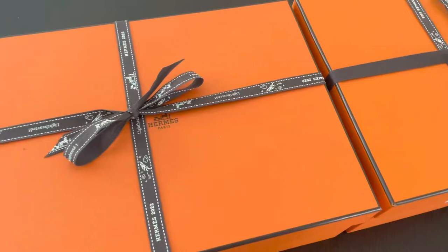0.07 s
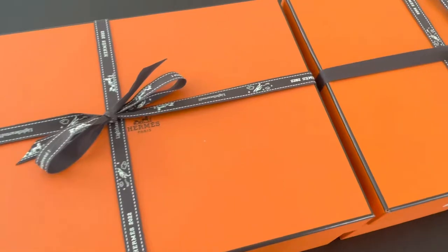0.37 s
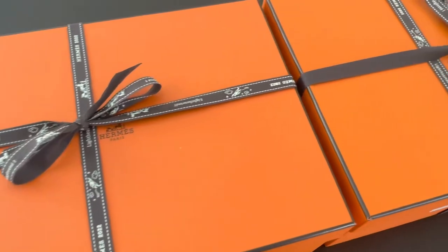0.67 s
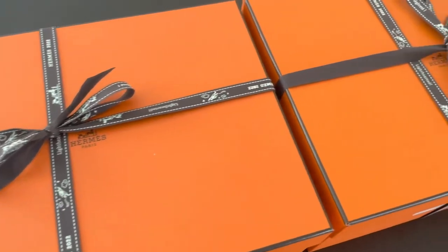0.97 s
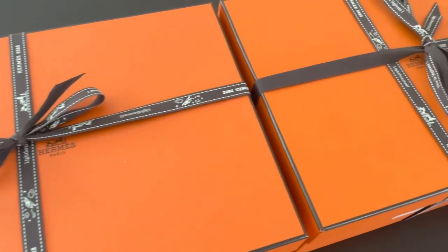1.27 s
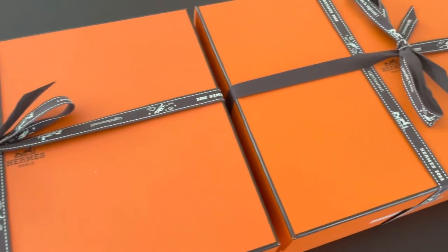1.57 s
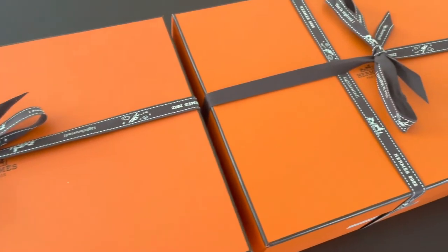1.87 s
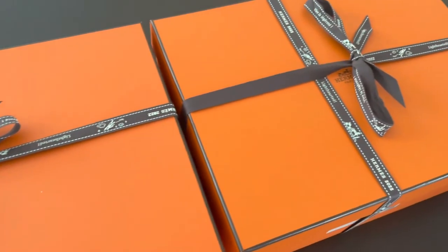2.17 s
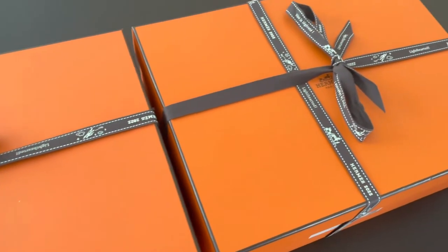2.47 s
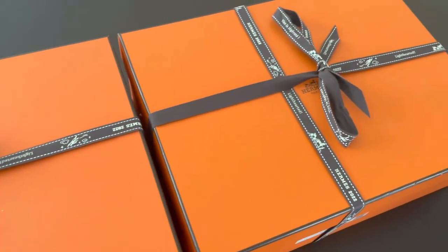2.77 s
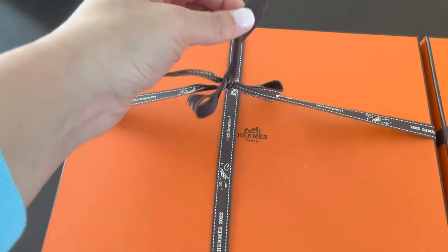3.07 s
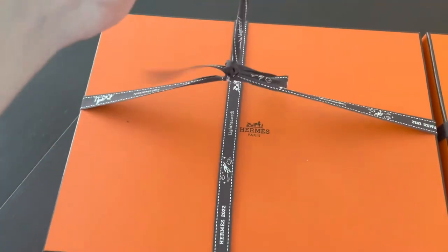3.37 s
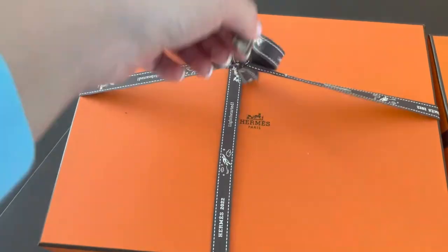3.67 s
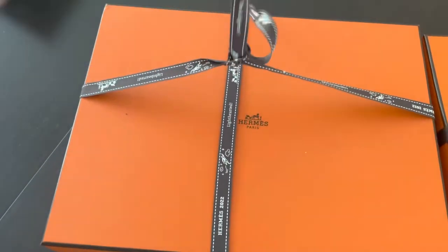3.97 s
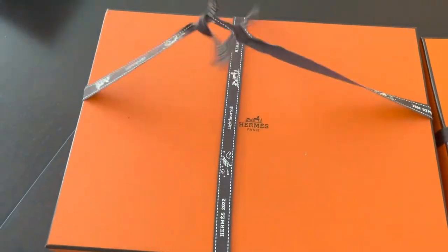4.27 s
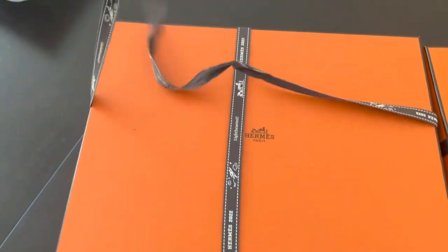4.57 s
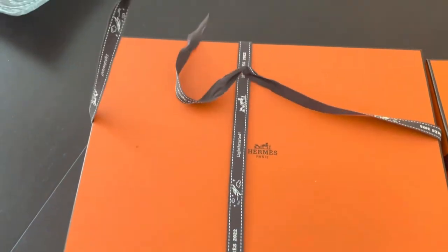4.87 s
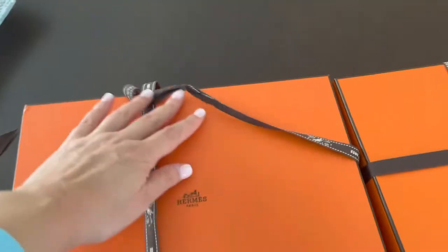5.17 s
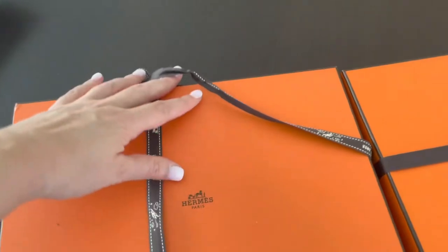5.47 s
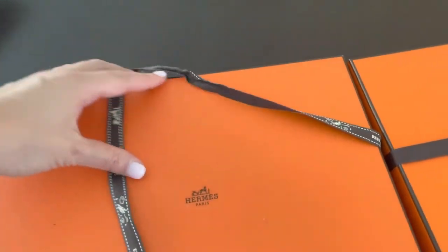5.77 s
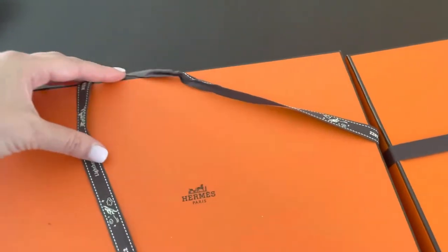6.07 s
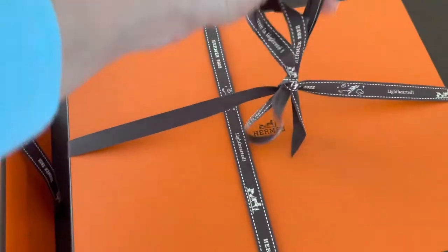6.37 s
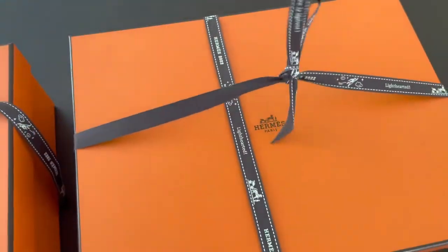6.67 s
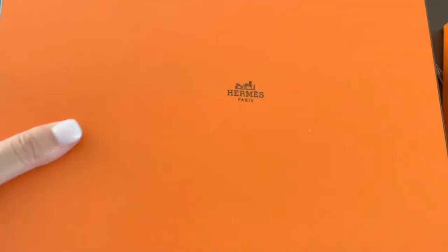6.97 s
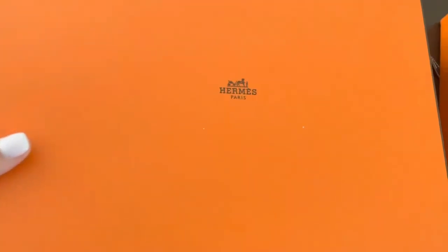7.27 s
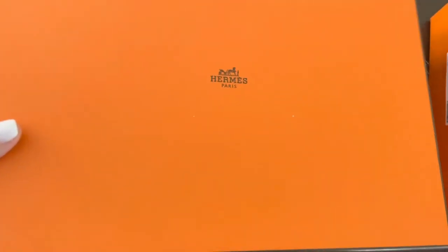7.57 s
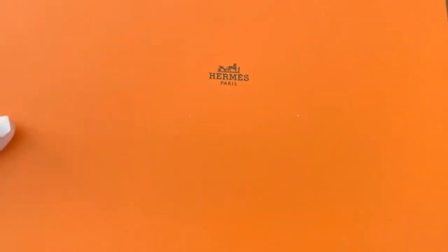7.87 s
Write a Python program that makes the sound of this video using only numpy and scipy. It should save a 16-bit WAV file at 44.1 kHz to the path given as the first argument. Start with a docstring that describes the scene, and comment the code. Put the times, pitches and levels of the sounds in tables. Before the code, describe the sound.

In a softly humming room, two ribbon bows are pulled loose in quick, hissing tugs, and a hand brushes over hollow cardboard boxes.

```python
"""A quiet room fades in, humming. Near 3 s a woven ribbon rasps through its knot on a cardboard gift
box in quick pulls, snaps free and slides off, while small taps rattle on the lid. From 5 s a hand
brushes the hollow box. Just after 6 s a second bow is untied on another box; then fingers and a palm
rub that box, which rumbles as it shifts. Every stroke speeds up, holds and dies away, its hiss, card
scrape and lid drone sharing that envelope. Along the way the level dips briefly five times."""
import sys
import numpy as np
from scipy import signal
from scipy.fft import rfft, irfft, next_fast_len
from scipy.io import wavfile
from scipy.ndimage import uniform_filter1d, map_coordinates

SR = 44100
rng = np.random.default_rng(int(sys.argv[2]) if len(sys.argv) > 2 else 0)


def generate_wav(sig):
    """Save sig (samples, or channels by samples) to the path in sys.argv[1] as 16-bit PCM at SR."""
    pcm = np.round(np.clip(np.atleast_2d(sig).T, -1, 1) * 32767).astype(np.int16)
    wavfile.write(sys.argv[1], SR, pcm)


N = 349713
TIME = np.arange(N) / SR
SECOND_BOX_S = 6.1  # strokes from here on are on the neighbouring box


# Ribbon strokes through a knot. Each row: moment of full speed in seconds, hold in seconds, rise and
# fall in seconds per 20 dB, hiss level in dB, scrape and drone in dB over the hiss, lid pitch in Hz.
PULLS = [(3.08, .0169, .0088, .0464, -43.5, -9.5, -3.5, 310),
         (3.115, .059, .0192, .0611, -49, -7.5, 3, 390), (3.18, .0227, .0529, .0676, -44, -10.5, -3, 360),
         (3.223, .024, .0121, .06, -53, -5, 5, 250), (3.743, .0548, .0409, .0327, -48, -15, -5.5, 210),
         (3.834, .0433, .0341, .139, -51, -11, 0, 210), (3.911, .094, .1, .0342, -53.5, -9, -3, 330),
         (6.172, .038, .0244, .0194, -59.5, -13, -9, 220), (6.216, .043, .01, .0118, -45, -12, -4, 270),
         (6.285, .11, .0421, .08, -44.5, -9, -2.5, 250), (6.43, .045, .0632, .035, -58, -13, 6, 150),
         (6.502, .065, .003, .0618, -44, -8, -4, 240), (6.6, .0199, .0678, .0949, -49.5, -14, 2, 220),
         (6.65, .0237, .0215, .12, -52, -6, 1, 180), (6.755, .02, .07, .018, -46.5, -.5, 4.5, 350),
         (6.794, .016, .06, .0228, -53, -8, -8, 330), (6.821, .036, .016, .045, -41.5, -5, -9, 400)]
KNOT_CREEP = [(3.415, .024, .024, .111, -73.5, -19.5, 7, 270), (3.59, .1074, .125, .027, -67, 5, 2.24, 280)]  # the knot creeping under tension, rows as in PULLS
SLACK_SLIDES = [(4.14, .0408, .11, .062, -60.5, -12.5, 3.5, 260),
                (4.226, .127, .006, .096, -61, -12, -1.5, 260), (4.425, .1812, .072, .112, -69, -8, 6, 280),
                (4.68, .121, .059, .088, -79, -21, 3, 260)]  # the loosened band sliding off, rows as in PULLS
# Tone of the weave's hiss and of two scrapes. Each row: frequency in Hz, level in dB.
WEAVE_HISS = [(1200, -35.5), (2800, -18), (3800, -10.5), (4700, -5), (5500, -7.5), (6600, -1.5), (7700, 0),
              (8900, 1.5), (10800, 0), (13000, .5), (14500, -7), (16000, -18)]
SATIN_SCRAPE = [(350, -16), (650, -1), (900, -1), (1200, 2.5), (1650, -2.5), (1950, -4.5), (2400, -5),
                (3100, -7), (3800, -7.5), (5000, -11.5), (9000, -39.5)]
KNOT_SCRAPE = [(400, 8), (800, 1), (1300, 3), (2100, 7.5), (2700, 2), (3800, -6.5), (8000, -37.5)]
# The first box's card bending and lid resonances. Each row: frequency in Hz, width in Hz, level in dB.
FIRST_CARD = [(827.3, 33, 2), (1050.4, 70, -3), (1170, 91, -0.5), (1264, 48, -3), (1363.6, 35, 0.5),
              (1564, 87, -6), (1850, 110, -3), (2400, 150, 1)]
FIRST_LID = [(100, 60, 0), (166.5, 53, -4), (229.5, 26, 4), (263.5, 30, -2), (312.2, 28, 2), (387, 26, 7),
             (427, 24, -8)]

def first_bow():
    """Ribbon rasps through the knot, creeps under tension and slides off, setting the lid droning."""
    pulls, _ = by_box(PULLS)
    rasp = rubbing(pulls, WEAVE_HISS, SATIN_SCRAPE, FIRST_CARD, slips_per_s=3700, grit_per_s=350,
                   scatter_db=2, judder_db=1.45, grit_db=1, patchy_db=3.2, ring_db=-2,
                   hiss_db=-.69, scrape_db=-1.5)
    creep = rubbing(KNOT_CREEP, WEAVE_HISS, KNOT_SCRAPE, FIRST_CARD, slips_per_s=3000, grit_per_s=400,
                    scatter_db=3, judder_db=1.5, grit_db=-7, patchy_db=3, ring_db=-18.5, hiss_db=1)
    slide = rubbing(SLACK_SLIDES, WEAVE_HISS, SATIN_SCRAPE, FIRST_CARD, slips_per_s=2200, grit_per_s=280,
                    scatter_db=1, judder_db=2.6, grit_db=-6, patchy_db=3, ring_db=-6.5, scrape_db=-2)
    drone = lid_drone(pulls + KNOT_CREEP + SLACK_SLIDES, FIRST_LID, trim_db=-2)
    return rasp + creep + slide + drone + snags(pulls)


# Tone of the second ribbon's scrape. Each row: frequency in Hz, level in dB.
SECOND_SCRAPE = [(350, -14), (650, 0), (900, 1), (1200, 0), (1650, -2.5), (2000, -4), (2400, -5.5),
                 (3000, -6.5), (3900, -8.5), (5000, -8.5), (9000, -39.5)]
# The second box's card bending and lid resonances. Each row: frequency in Hz, width in Hz, level in dB.
SECOND_CARD = [(693.7, 41, -0.5), (836, 28, 0), (933, 28, 2), (1030.6, 30, 2.5), (1163.6, 50, 3.5),
               (1421, 54.9, -2), (1596.6, 39, 6), (1958, 94, -3), (2380, 120, -5)]
SECOND_LID = [(165.5, 28, 2), (240, 36, 4), (292, 30, 2), (342, 36, 1.5), (408.8, 50, -3), (499, 50, 2),
              (620, 90, 0)]

def second_bow():
    """Ribbon rasps through the knot on the neighbouring box, which has resonances of its own."""
    _, pulls = by_box(PULLS)
    rasp = rubbing(pulls, WEAVE_HISS, SECOND_SCRAPE, SECOND_CARD, slips_per_s=4500, grit_per_s=380,
                   scatter_db=2.5, judder_db=1.1, grit_db=1, patchy_db=3.6, ring_db=-1, scrape_db=-.73)
    return rasp + lid_drone(pulls, SECOND_LID, trim_db=-1) + snags(pulls)


def snags(pulls):
    """Single threads snag at random: sparse ticks, as strong as the pull that makes them."""
    hiss_gain, scrape_gain = stroke_gains(pulls)
    ticks = catches(per_s=34, scatter_db=3.5)
    bright = amp(-19) * hiss_gain * coloured(ticks, WEAVE_HISS)
    return bright + amp(-11) * scrape_gain * coloured(ticks, SATIN_SCRAPE)


# The ribbon snaps taut or flicks free. Each row: start in seconds, level in dB, 60 dB decay in seconds,
# flap in dB over the hiss, flap pitch in Hz.
SNAPS = [(3.034, -53, .0186, -24, 1500), (3.078, -30, .04, -16, 1300), (3.220, -35.5, .02, -4, 2400),
         (3.241, -44.5, .035, 5, 1170), (3.3885, -48, .0211, -2.5, 1500), (3.7207, -38, .025, -15, 1500),
         (3.738, -32, .0173, -13.5, 1300), (3.8179, -26, .0158, -9, 1700), (3.889, -45, .0215, 5, 1250),
         (3.980, -37, .024, -2, 1900), (4.1542, -48, .02, -9, 1300), (4.292, -34, .0243, -16, 1500),
         (4.3173, -27, .017, -17, 1500), (4.332, -28.5, .036, -18, 1200), (4.4465, -48, .0317, -1, 2000),
         (4.482, -60, .039, 4, 1800), (4.517, -53.5, .0215, -4, 1600), (4.556, -43, .026, -5, 1500),
         (6.509, -42, .02, 7, 1150), (6.527, -30, .025, -6, 2300), (6.6015, -28.5, .035, -11, 1500),
         (6.645, -34, .012, -20, 1500), (6.655, -20.5, .026, -9, 1600), (6.677, -32, .02, 2, 1700),
         (6.755, -39, .02, 5, 1600), (6.766, -37, .025, 5, 1100), (6.777, -38, .012, -3, 900),
         (6.826, -35, .03, 0, 1000), (6.835, -31, .014, -2, 1900), (6.851, -19.5, .0125, -11, 1200),
         (6.8605, -26, .016, -3, 1300), (6.883, -36, .012, -2, 1300), (6.899, -46, .0134, -6, 1300)]
# Tone of a taut fold letting go. Each row: frequency in Hz, level in dB.
CREASE_HISS = [(1200, -30), (2800, -18), (3800, -11), (4800, 1), (5600, -4), (6700, 3), (7700, 0),
               (8800, 3), (10800, -2), (12700, -1), (14500, -9), (16000, -22)]

def snaps(trim_db=-6.5, rise_s=.00025):
    """Each snap is a burst of fibre slips at a fold, with the soft flap of the freed ribbon."""
    out, t = np.zeros((2, N)), np.arange(SR // 10) / SR
    for start, db, t60, flap_db, flap_hz in SNAPS:
        hiss, flap = rng.standard_normal((2, 2, len(t)))
        flap = unit(filtered(flap, lambda hz: near(hz, flap_hz, octaves=.5)))
        envelope = amp(db + trim_db - 60 * t / t60) * (1 - np.exp(-t / rise_s))
        add(out, start, envelope * (coloured(hiss, CREASE_HISS) + amp(flap_db) * flap))
    return out


BRUSHES = [(2.868, .0102, .0355, .11, -67, -20.5, -3, 280),
           (3.05, .0132, .0267, .0165, -62.5, -16, -5, 280), (5.152, .0378, .029, .107, -64, -11.5, 6, 300),
           (5.3, .167, .102, .106, -83.5, -1.5, 9.5, 250), (5.57, .2644, .1644, .2204, -61, -4, 1.5, 310),
           (5.93, .0526, .093, .061, -68.5, 0, 14.5, 310), (6.92, .0412, .048, .056, -72, -5.5, -1.5, 250),
           (7.014, .055, .0366, .106, -62, 4, 10, 300), (7.193, .0359, .169, .0556, -58.5, 3, 5.5, 360)]  # fingers and loose ends brushing a lid, rows as in PULLS
PALM_PUSHES = [(7.338, .0156, .014, .03, -76, 13, 21, 250), (7.375, .04, .0403, .044, -68, 12.5, 20.5, 380),
               (7.445, .055, .044, .04, -87, 23.7, 34.5, 260),
               (7.507, .016, .012, .046, -58, 12.5, 10, 330),
               (7.545, .026, .042, .045, -61, 8.5, 17.5, 370), (7.59, .02, .02, .02, -76, 16, 28, 420)]  # the palm pushing over cardboard, rows as in PULLS
# Tone of skin on card: its hiss and three scrapes. Each row: frequency in Hz, level in dB.
SKIN_HISS = [(1200, -30), (2800, -12), (3800, -6), (4700, -2), (5500, -4.5), (6600, 0), (8700, 1.5),
             (10800, -.5), (13000, -.5), (14200, -8), (16000, -30)]
HAND_SCRAPE = [(350, -6), (550, 2), (800, 1.5), (1300, 0), (1900, -5), (3100, -6), (4500, -8), (9000, -35)]
FINGER_SCRAPE = [(350, -12), (600, -2), (950, -2), (1230, 5), (1560, 1), (1800, -6), (2800, -6), (4900, -9),
                 (9000, -35)]
PALM_SCRAPE = [(350, -12), (600, 2), (850, 2), (1250, -1.5), (1700, 1), (2000, -4), (2350, -1.5),
               (2800, -3.5), (3050, -8.5), (3500, -8), (4100, -15.5), (4700, -14), (6000, -25),
               (10000, -50)]
# Lid resonances under the flat hand and the palm. Each row: frequency in Hz, width in Hz, level in dB.
HAND_LID = [(170, 70, -1), (280, 70, 2), (355, 45, 2), (540, 120, -6)]
PALM_LID = [(202.8, 69, 6), (339.2, 44.4, 6), (400, 31.6, 0.5), (476, 83, 4), (624, 220, 0)]

def hand():
    """Skin brushes each lid, then the palm pushes over the second; the hollow boxes drone underneath."""
    first, second = by_box(BRUSHES)
    light_touch = dict(slips_per_s=9000, grit_per_s=990, scatter_db=1, judder_db=.89, grit_db=-6,
                       hiss_db=-1.5, scrape_db=-1)
    flat_hand = rubbing(first, SKIN_HISS, HAND_SCRAPE, FIRST_CARD,
                        patchy_db=2.5, ring_db=-9, **light_touch)
    fingers = rubbing(second, SKIN_HISS, FINGER_SCRAPE, SECOND_CARD,
                      patchy_db=2.2, ring_db=-7, **light_touch)
    palm = rubbing(PALM_PUSHES, SKIN_HISS, PALM_SCRAPE, SECOND_CARD, slips_per_s=3000, grit_per_s=600,
                   scatter_db=2, judder_db=1.2, grit_db=-6, patchy_db=3.4, ring_db=-15, hiss_db=-3.5)
    drone = lid_drone(first, HAND_LID) + lid_drone(second + PALM_PUSHES, PALM_LID)
    return flat_hand + fingers + palm + drone


def rubbing(strokes, hiss_tone, scrape_tone, card_modes, slips_per_s, grit_per_s,
            scatter_db, judder_db, grit_db, patchy_db, ring_db, hiss_db=0, scrape_db=0):
    """Sliding contact: fine slips hiss; coarser catches add grit to the card scrape."""
    hiss_gain, scrape_gain = stroke_gains(strokes)
    grip = amp(judder_db * (wobble(380) + .27 * wobble(90)))
    slips = shifting_contact(grip * catches(slips_per_s, scatter_db), patchy_db)
    grit = amp(grit_db) * unit(grip * catches(grit_per_s, scatter_db=2))
    hiss = hiss_gain * coloured(slips, hiss_tone)
    scrape = scrape_gain * card_scrape(slips + grit, scrape_tone, card_modes, ring_db)
    return amp(hiss_db) * hiss + amp(scrape_db) * scrape


def catches(per_s, scatter_db):
    """Fibres catch and let go: two streams of tiny impulses at random moments, of scattered size."""
    size = amp(scatter_db * np.clip(rng.standard_normal((2, N)), -2, 1))
    caught = rng.random((2, N)) < per_s / SR
    return unit(caught * rng.choice([-1, 1], (2, N)) * size)


def shifting_contact(x, patchy_db):
    """The touching spot wanders over folds and card, so the colour changes in small irregular patches."""
    spectra = signal.stft(x, nperseg=512)[2]
    patches = uniform_filter1d(rng.standard_normal(spectra.shape[1:]), size=3, axis=0)
    patches = unit(uniform_filter1d(patches, size=8, axis=1))
    return unit(signal.istft(spectra * amp(patchy_db * patches), nperseg=512)[1][:, :N])


def card_scrape(contact, tone, modes, ring_db):
    """Stiff card answers a contact with a broad scrape plus its bending resonances, at rms 1."""
    def bending(f):
        return sum(amp(db) * 1j * f * width / (hz ** 2 - f ** 2 + 1j * f * width)
                   for hz, width, db in modes)
    return unit(coloured(contact, tone) + amp(ring_db) * unit(filtered(contact, bending)))


def lid_drone(strokes, modes, trim_db=0):
    """The lid drones under each stroke; the spot that is rubbed decides which resonances lead."""
    out, t = np.zeros((2, N)), np.arange(-SR // 4, SR * 2 // 3) / SR
    for at, hold, rise, fall, db, _, drone_db, pitch in strokes:
        def lid(f):
            return sum(amp(mode_db) * near(hz, pitch, octaves=.9) * steep_peak(f, hz, 1.5 * width)
                       for hz, width, mode_db in modes)
        ring = unit(filtered(rng.standard_normal((2, len(t))), lid))
        add(out, at + t[0], amp(db + drone_db + trim_db) * swell(t, hold, rise, fall) * ring)
    return out


# Taps and rattles on the lid. Each row: start in seconds, level in dB, favoured pitch in Hz,
# clack in dB relative to the knock.
KNOCKS = [(3.083, -45, 269.6, -26), (3.428, -53.5, 286, -21), (3.585, -42, 321, -9.5),
          (3.617, -49, 300, -11), (3.819, -48, 240, -7), (4.049, -34, 335, -19), (4.448, -38.5, 360, -15),
          (4.484, -52, 400, -14.5), (4.516, -49.5, 380, -21), (4.557, -37.5, 420, -5),
          (4.566, -44, 370, -16), (4.579, -49, 480, -10), (4.602, -56, 560, -8), (4.990, -60, 400, 7),
          (5.092, -63, 405, -2), (5.146, -45, 340, -12.5), (5.168, -46, 280, -21.5),
          (5.182, -47.5, 259, -16.5), (5.953, -46, 322, -34.5), (6.506, -43, 260, -11),
          (6.654, -31, 300, -7), (6.667, -33, 150, -27), (6.898, -52.5, 300, 1), (7.057, -37, 290, -8),
          (7.507, -43.5, 360, -6), (7.565, -39, 350, -19.5), (7.604, -42, 350, -15)]
# Modes of the hollow box. Each row: frequency in Hz, level in dB, 60 dB decay in seconds.
BOX_MODES = [(133.6, 8.5, 0.069), (181.4, -8, 0.17), (239.8, -3, 0.088), (312.5, 2.5, 0.0766),
             (368.4, -1.5, 0.0886), (457, 1.5, 0.0625), (558.8, -0.5, 0.0827), (708, -10, .06)]

def knocks(trim_db=.5, attack_s=.0033, scatter_cycles=.0874):
    """A knock rings the box modes near a pitch set by where it lands; a hard contact adds a clack."""
    out, t = np.zeros((2, N)), np.arange(SR // 4) / SR
    hz, mode_db, t60 = np.transpose(BOX_MODES)[:, :, None]
    bend_lag = 2.3 * np.log(hz)  # in cycles: low bending waves trail the high ones
    for start, db, pitch, clack_db in KNOCKS:
        strength = amp(mode_db + rng.normal(0, 1, hz.shape)) * near(hz, pitch, octaves=.415)
        phase = rng.random((2, 1, 1)) + rng.normal(0, scatter_cycles, (2, len(hz), 1))
        modes = strength * amp(-60 * t / t60) * np.sin(2 * np.pi * (hz * t - bend_lag + phase))
        ring = modes.sum(axis=1) * (1 - np.exp(-(t / attack_s) ** 2))
        ring /= np.abs(ring).max(axis=1, keepdims=True)
        add(out, start, amp(db + trim_db) * (ring + amp(clack_db) * clack(t)))
    return out


# Tone of a hard contact on card. Each row: frequency in Hz, level in dB.
CLACK_TONE = [(400, -9.5), (750, -1), (1020, 3), (1220, -3), (1450, -10.5), (1900, -8.5), (2400, -17.5),
              (3000, -32.5), (5000, -32), (12000, -45)]

def clack(t, noise_db=-5.5, noise_t60=.035, ring_db=-12, rise_s=.000499):
    """A hard contact gives a burst of noise and briefly rings the card's bending resonances."""
    hz, width, db = np.transpose(FIRST_CARD)[:, :, None]
    burst = coloured(rng.standard_normal((2, len(t))), CLACK_TONE) * amp(noise_db - 60 * t / noise_t60)
    decay = amp(db + along(CLACK_TONE, hz)) * np.exp(-np.pi * width * t)
    bending = decay * np.sin(2 * np.pi * (hz * t + rng.random((2, len(hz), 1))))
    return (1 - np.exp(-t / rise_s)) * (burst + amp(ring_db) * bending.sum(axis=1))


# The box shifts under the hand. Each row: moment of full speed in seconds, hold in seconds, level in dB.
NUDGES = [(6.421, 0.505, -54.5), (6.669, 0.0525, -46.5), (7.078, 0.1675, -52), (7.51, 0.044, -46)]

def nudges():
    """The whole box rumbles as it is nudged over the table."""
    power = sum((amp(db) * swell(TIME - at, hold, rise=.13, fall=.125)) ** 2 for at, hold, db in NUDGES)
    rumble_tone = [(20, -29.5), (40, -1.5), (68, 8.5), (100, 10), (150, 7), (260, -41)]
    return np.sqrt(power) * coloured(rng.standard_normal((2, N)), rumble_tone)


# Left-right phase difference for the main sounds and for the second bow; the highest treble is in phase
# and nearly mono. Each row: frequency in Hz, right channel's lead in radians.
MAIN_PHASE = [(100, 0), (5000, 0), (5800, 1.6), (6500, 1), (7500, 2.5), (8600, 3.14), (10000, 3.95),
              (12000, 5.3), (13000, 6.28)]
SECOND_BOW_PHASE = [(100, 0), (2000, -.3), (2900, -2.1), (4300, -2.8), (6000, -5), (7000, -5.7),
                    (7600, -3.7), (8600, -3.14), (12000, -1), (13000, 0)]
# Stereo width. Each row: frequency in Hz, gain of the side signal.
STEREO_WIDTH = [(100, .15), (400, .2), (800, .4), (1600, .38), (3500, .55), (6500, .42), (8600, .12),
                (11000, .35), (13000, .12)]

def stereo(pair, phase):
    """Mid and side become left and right, with a width and phase difference that vary by frequency."""
    def phase_shift(hz):
        turn = np.exp(.5j * along(phase, hz) * np.array([[-1], [1]]))
        return turn / np.hypot(1, along(STEREO_WIDTH, hz))
    mid, side = pair[0], filtered(pair[1], lambda hz: along(STEREO_WIDTH, hz))
    return filtered(np.array([mid + side, mid - side]), phase_shift)


# The room's reverb. Each row: frequency in Hz, 60 dB decay in seconds.
ROOM_DECAY = [(150, 0.507), (1000, 0.212), (5000, 0.12), (14000, 0.082)]

def reverb(x):
    """The room returns a diffuse stereo tail, nearly mono in the bass."""
    hz, t, spectra = signal.stft(rng.standard_normal((2, SR // 3)), SR, nperseg=128)
    decay = amp(-60 * t / along(ROOM_DECAY, hz)[:, None])
    mid, side = signal.istft(spectra * decay, SR, nperseg=128)[1]
    side = filtered(side, lambda f: along(STEREO_WIDTH, f))
    mid = filtered(mid, lambda f: np.sqrt(2 - along(STEREO_WIDTH, f) ** 2))
    tail = np.array([mid + side, mid - side])
    return signal.fftconvolve(x[None], tail / np.linalg.norm(tail[0]), axes=1)[:, :N]


# Mains hum partials, then the tone of the room's air. Each row: frequency in Hz, level in dB.
MAINS_HUM = [(59.6, -74), (119.8, -56)]
AIR_TONE = [(20, -44), (32, -23.5), (44, -11.5), (60, -1), (85, -12.5), (115, -7.5), (150, -13.5),
            (200, -18.5), (328, -34.5), (485, -38), (825, -47.5), (3000, -57.5), (6000, -59.5), (9000, -67),
            (12600, -62), (14000, -71.5), (16000, -80)]

def room_tone(hum_trim_db=-.5, waver_db=.98, air_db=-59.85, right_over_left_db=3):
    """An appliance hums steadily over a low rumble and faint hiss."""
    hum = np.zeros(N)
    for hz, db in MAINS_HUM:
        level = np.sqrt(2) * amp(db + hum_trim_db + waver_db * wobble(3))
        hum += level * np.sin(2 * np.pi * hz * TIME + .098 * wobble(1.9))
    mid, side = coloured(rng.standard_normal((2, N)), AIR_TONE)
    side = filtered(side, lambda hz: along([(100, .25), (400, .94), (1500, 1), (12000, .86)], hz))
    air = amp(air_db) * np.array([mid + side, mid - side])
    return (hum + air) * amp([[-right_over_left_db / 2], [right_over_left_db / 2]])


def by_box(strokes):
    """The strokes on the first box and those on its neighbour."""
    return ([row for row in strokes if row[0] < SECOND_BOX_S],
            [row for row in strokes if row[0] >= SECOND_BOX_S])


def stroke_gains(strokes):
    """Gain curves of hiss and scrape; overlapping strokes add in power."""
    power = np.zeros((2, N))
    for at, hold, rise, fall, db, scrape_db, _, _ in strokes:
        power += (amp([[db], [db + scrape_db]]) * swell(TIME - at, hold, rise, fall)) ** 2
    return np.sqrt(power)


def swell(t, hold, rise, fall):
    """A movement reaches full speed at t = 0, holds and dies away; slopes are in seconds per 20 dB."""
    early, late = np.maximum(-t, 0), np.maximum(t - hold, 0)
    return amp(-20 * np.minimum(early / rise + late / fall, 10))


def near(hz, pitch, octaves):
    """Gain that favours frequencies around a pitch."""
    return 1 / (1 + (np.log2((hz + 1) / pitch) / octaves) ** 2)


def steep_peak(hz, centre, width):
    """Gain of a steep-skirted resonance."""
    return (hz * width) ** 2 / ((centre ** 2 - hz ** 2) ** 2 + (hz * width) ** 2)


def amp(db):
    """Decibels to gain."""
    return 10 ** (np.asarray(db) / 20)


def unit(x):
    """Scale to rms 1."""
    return x / np.sqrt(np.mean(x ** 2) + 1e-20)


def along(points, hz):
    """(Hz, value) points read on a log axis."""
    freqs, values = np.transpose(points)
    return np.interp(np.log(hz + 1), np.log(freqs + 1), values)


def wobble(rate):
    """A smooth random curve through rate points a second."""
    return map_coordinates(rng.standard_normal(int(N * rate / SR) + 4), [TIME * rate])


def filtered(x, response):
    """x through a complex frequency response."""
    size = x.shape[-1]
    padded = next_fast_len(size + SR // 4)
    return irfft(rfft(x, padded) * response(np.fft.rfftfreq(padded, 1 / SR)), padded)[..., :size]


def coloured(x, tone):
    """x shaped by (Hz, dB) points, at rms 1."""
    return unit(filtered(x, lambda hz: amp(along(tone, hz))))


def add(track, start, sound):
    """Mix a sound in at start seconds."""
    part = track[:, round(start * SR):][:, :sound.shape[1]]
    part += sound[:, :part.shape[1]]


def scene():
    """Ribbon, hand and boxes in the room; the second bow's pulls have their own left-right phase."""
    main = first_bow() + snaps() + hand() + knocks() + nudges()
    second = second_bow()
    direct = stereo(main, MAIN_PHASE) + stereo(second, SECOND_BOW_PHASE)
    return direct + amp(-15.5) * reverb(main[0] + second[0]) + room_tone()


# Brief dips in the overall level. Each row: centre in seconds, depth in dB.
LEVEL_DIPS = [(2.838, 30.5), (3.706, 23), (5.133, 21), (6.146, 22.5), (6.981, 18.3)]

def record(dry, fade_start_s=.068, fade_s=.06, dip_s=.009, top_hz=16000):
    """The level fades in and dips briefly; the highest treble is cut off steeply."""
    fade = np.clip((TIME - fade_start_s) / fade_s, amp(-57), 1)
    dips_db = sum(depth * np.exp(-np.abs(TIME - at) / dip_s) for at, depth in LEVEL_DIPS)
    return filtered(dry * fade * amp(-dips_db), lambda hz: 1 / np.sqrt(1 + (hz / top_hz) ** 160))


dry = scene()
out = record(dry)
generate_wav(out)
```